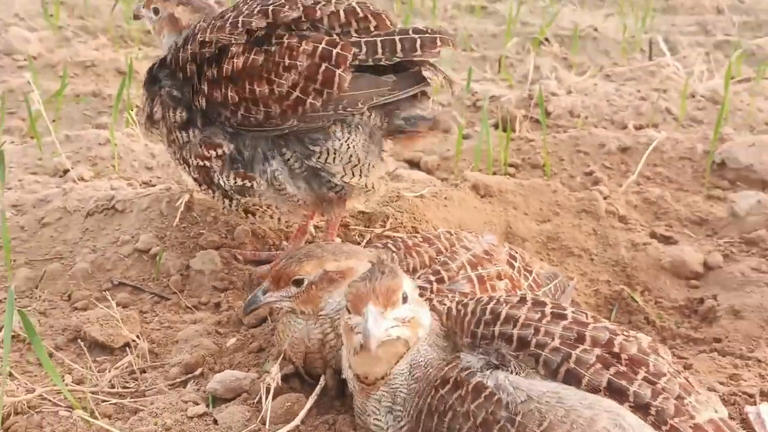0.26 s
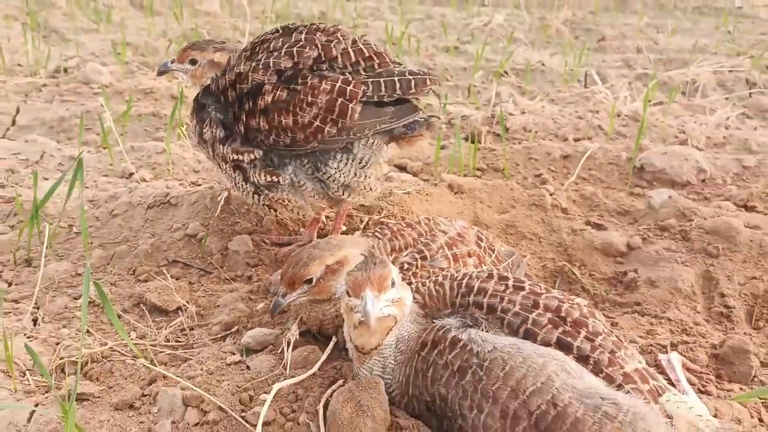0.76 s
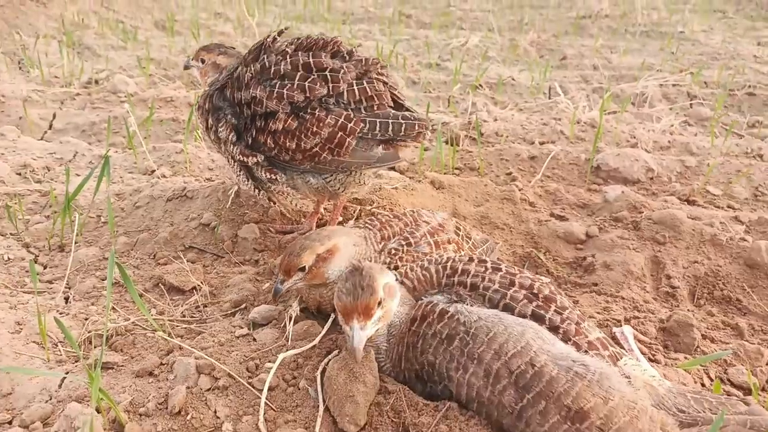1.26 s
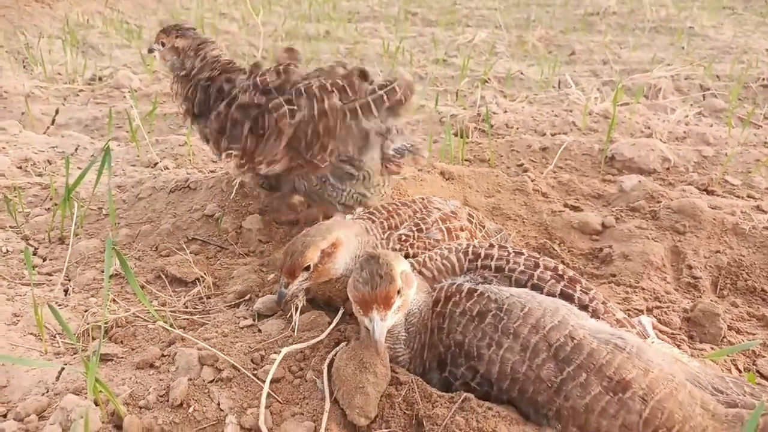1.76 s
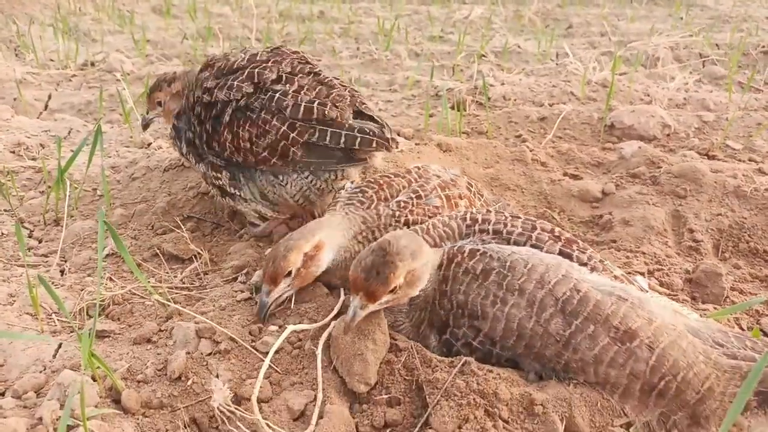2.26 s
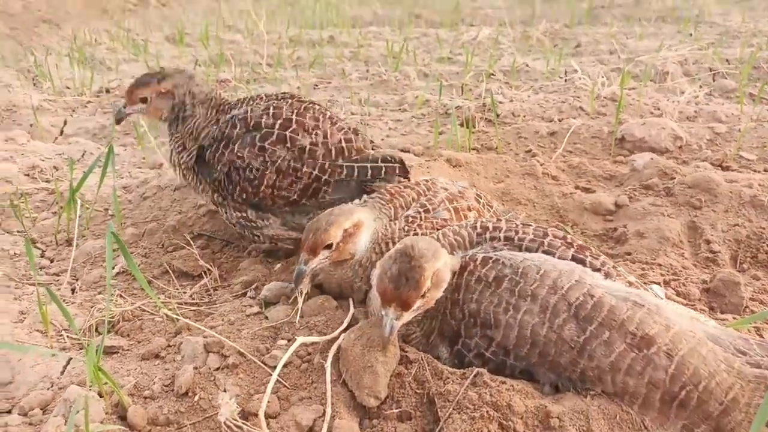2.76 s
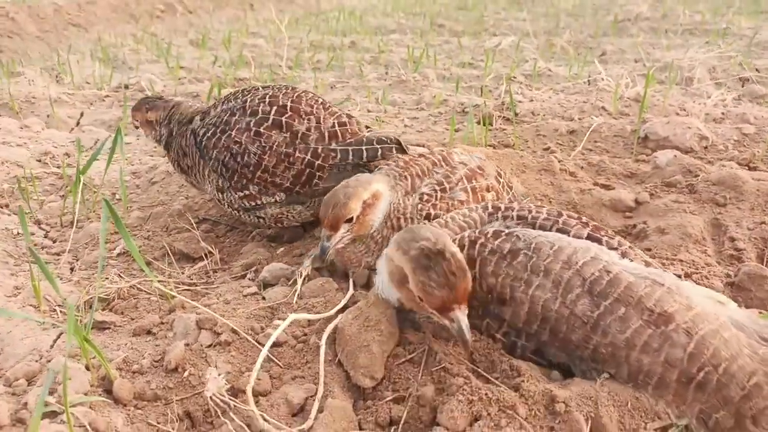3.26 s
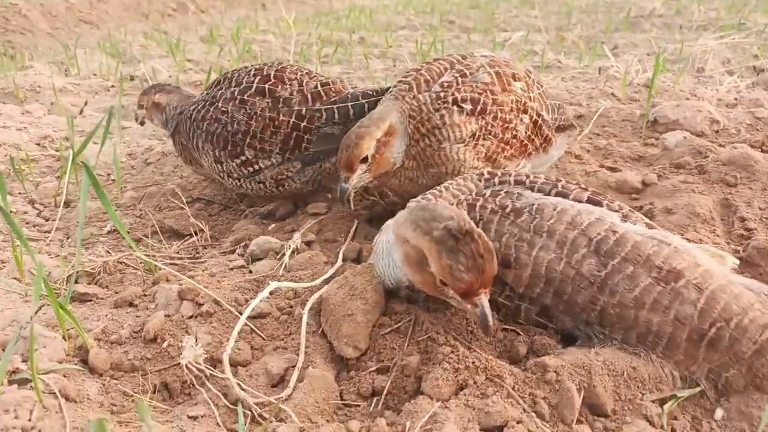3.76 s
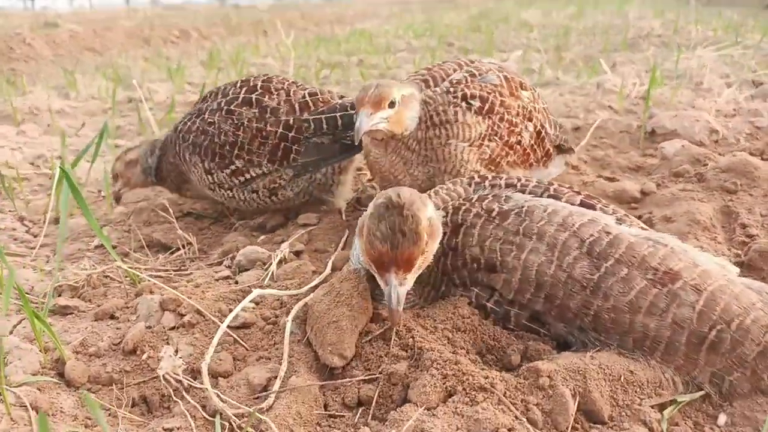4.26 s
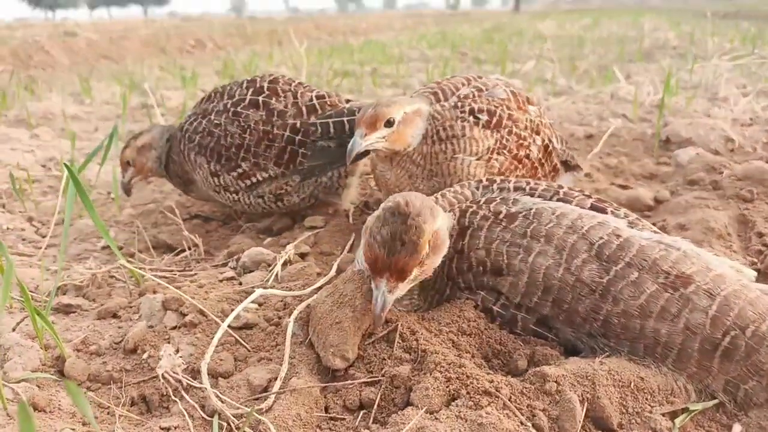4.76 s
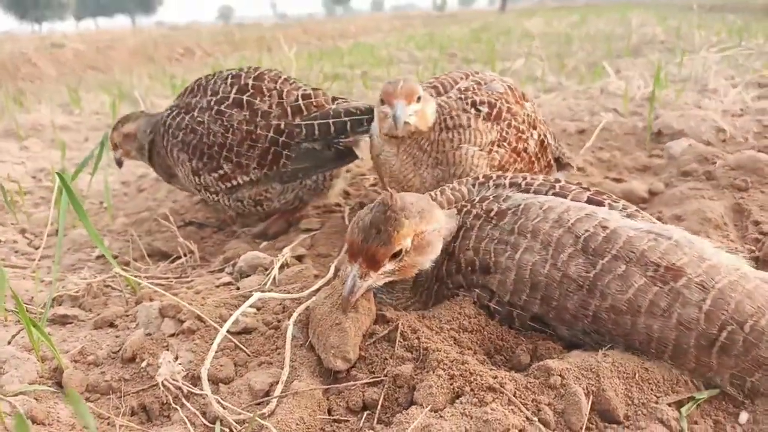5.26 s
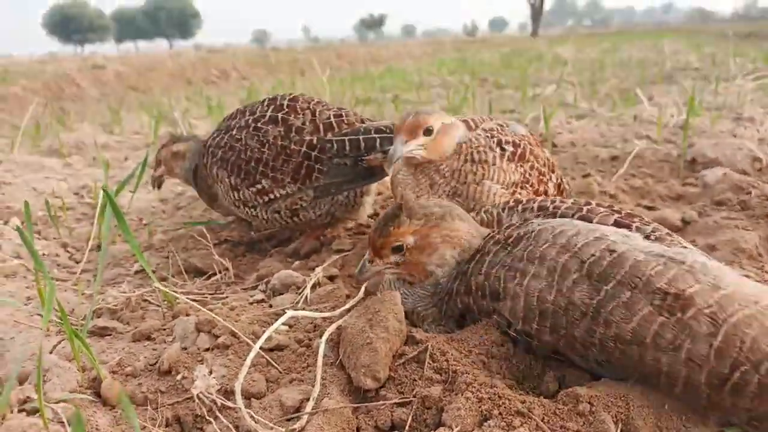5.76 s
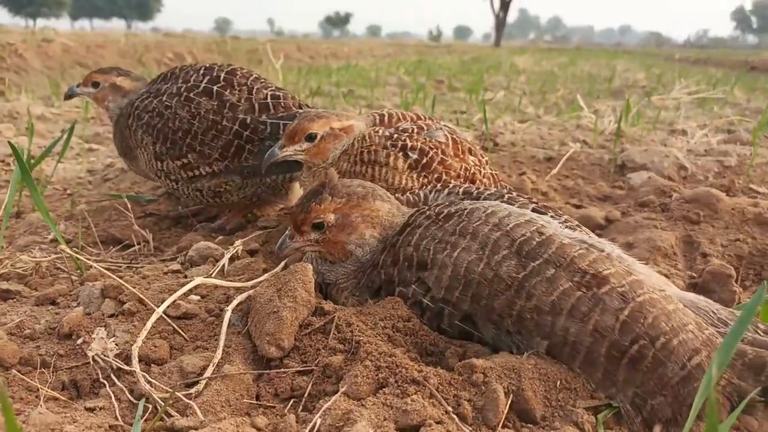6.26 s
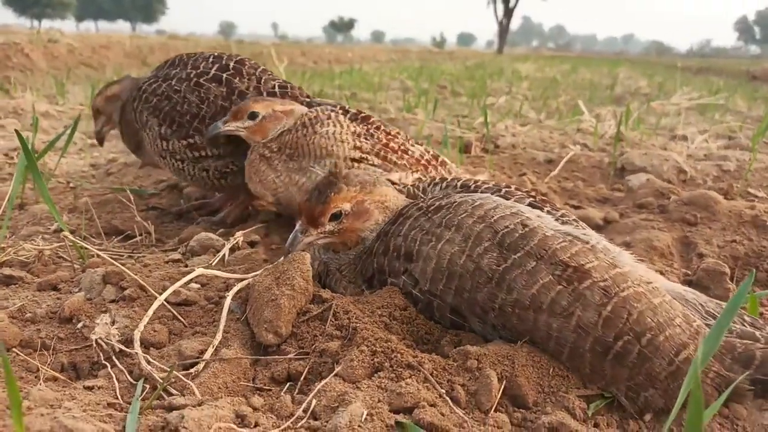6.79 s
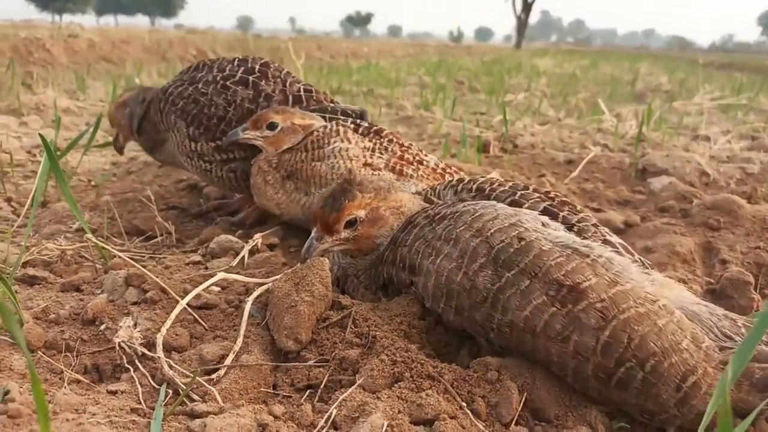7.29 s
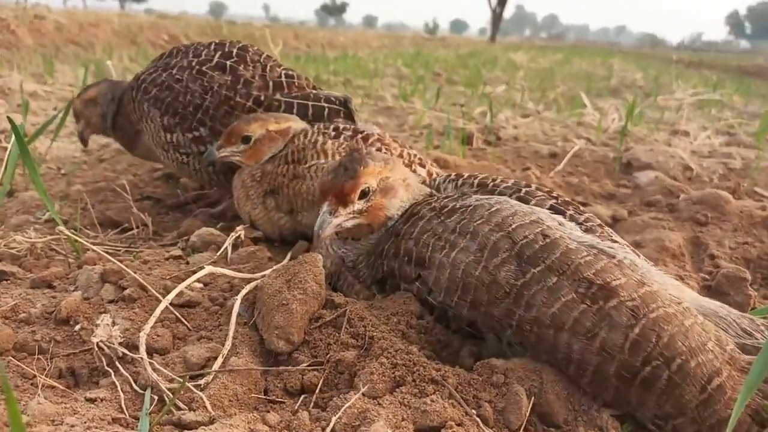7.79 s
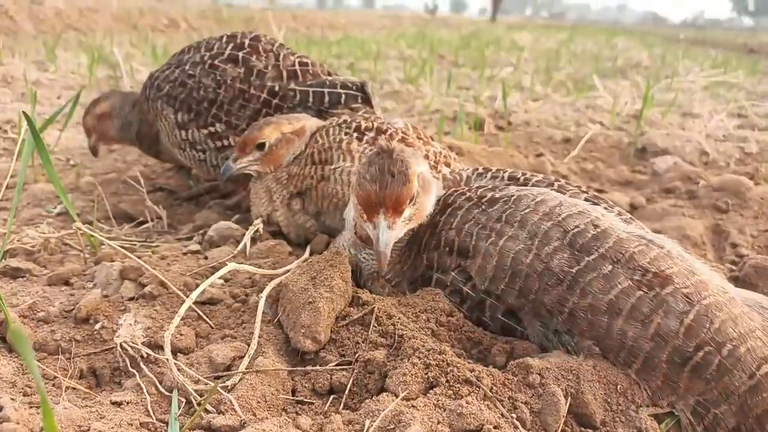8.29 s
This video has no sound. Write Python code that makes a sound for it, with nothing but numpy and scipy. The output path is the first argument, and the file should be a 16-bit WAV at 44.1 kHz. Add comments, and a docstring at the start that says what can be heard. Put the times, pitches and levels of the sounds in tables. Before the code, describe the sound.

Three young partridges peck, shake their feathers and kick up loose dry soil in a quiet open field, with tiny soft peeps.

```python
"""Three young partridges dust-bathe in loose dry soil, close to a microphone in an open field with a light breeze.
Beaks peck and click first; then one bird shakes its plumage, steps down on clods and kicks the ground in a run.
The thrown soil rains down, sand slides off the birds' backs, and stiff feathers sweep and scrape in the hollow.
Pecks and bill snaps return near the end. Soft peeps come between, and far birds call now and then.
Blows are damped modes of the ground, clicks are short rings, and soil is many tiny grains of coloured noise."""
import sys
import numpy as np
from scipy import signal
from scipy.fft import rfft, irfft, next_fast_len
from scipy.io import wavfile

SR = 44100
rng = np.random.default_rng(int(sys.argv[2]) if len(sys.argv) > 2 else 0)


def put_to_file(sound):
    """Save the sound as 16-bit audio at rate SR, in the file named by the first command-line argument."""
    columns = np.atleast_2d(sound).T  # one column per channel
    safe = np.clip(columns, -1, 1)
    whole_steps = np.round(safe * 32767)
    wavfile.write(sys.argv[1], SR, whole_steps.astype(np.int16))


N = 376173
TIME = np.arange(N) / SR

# a run of kicks into the ground: start_s, force_db, contact_hardness_hz, crumb_crack_db
KICK_ROWS = [(2.458, -19.5, 840, -27), (2.4785, -16.5, 845, -37), (2.517, -12.5, 730, -33),
             (2.5656, -11.5, 1070, -17), (2.5929, -12, 2088, -21), (2.6147, -11, 2223, -8),
             (2.644, -9.5, 2042, -9.5), (2.6894, -9.5, 950, -2), (2.724, -10, 565, -5.5),
             (2.7549, -11.5, 4130, -2.5)]
# pecks at the ground: start_s, force_db, ground_pitch_hz, crumb_crack_db
PECK_ROWS = [(0.3412, -39, 226, -55), (0.4682, -29.5, 302, -40.5), (0.51, -39.5, 269, -40),
             (.58, -26, 294, -24), (.619, -36.5, 328, -39), (.721, -23, 337, -26.5),
             (1.0858, -38.5, 368, -36.5), (1.1997, -27.5, 340, -48), (1.2725, -22.5, 410, -30),
             (1.513, -30.5, 350, -36), (1.542, -22, 346, -28.5), (6.4096, -40, 140, -54),
             (6.44, -30.5, 164, -34.5), (6.5396, -29.5, 185, -27), (6.573, -25.5, 167, -24.5)]
# colour of fine sand: frequency_hz, level_db
SAND_COLOUR = [(300, -11.5), (1500, -8), (3200, -4.5), (5500, -1), (8000, -7), (11000, -7), (15500, -1.5)]
# colour of grit: frequency_hz, level_db
GRIT_COLOUR = [(400, -31.5), (1200, -0.5), (2300, -16), (4000, 4), (6500, 4.5), (8500, -8.5),
               (12000, -29.5)]


def amp(db):
    """Decibels to gain."""
    return 10 ** (np.asarray(db) / 20)


def unit(x):
    """Scales to rms 1."""
    return x / np.sqrt(np.mean(x ** 2) + 1e-20)


def add(mix, s, sound):
    """Mixes a sound in at time s."""
    part = mix[max(round(s * SR), 0):][:len(sound)]
    part += sound[:len(part)]


def level(s, db):
    """Gain along a curve, silent outside it."""
    return amp(np.interp(TIME, s, db, left=-np.inf, right=-np.inf))


def burst(length, rise_s, fall_s):
    """Gain that rises linearly, holds until the given length in seconds, then decays exponentially."""
    t = np.arange(0, length + 10 * fall_s, 1 / SR)
    rise = np.minimum(t / rise_s, 1)
    return rise * np.exp(-np.maximum(t - length, 0) / fall_s)


def swells(rows):
    """Gain of bell-shaped swells (middle_s, half_length_s, level_db), added in power."""
    power = 0
    for middle_s, half_s, db in rows:
        bell = np.exp(-2 * np.minimum(((TIME - middle_s) / half_s) ** 2, 20))
        power = power + amp(db) ** 2 * bell
    return np.sqrt(power)


def colour(x, spectrum, size=2048):
    """Causal minimum-phase filter of unit energy with the given spectrum."""
    hz, db = np.transpose(spectrum)
    bins_hz = abs(np.fft.fftfreq(size, 1 / SR)) + 1
    log_gain = np.log(amp(np.interp(np.log(bins_hz), np.log(hz), db)))
    taps = np.fft.ifft(np.exp(np.conj(signal.hilbert(log_gain)))).real
    return signal.oaconvolve(x, taps / np.linalg.norm(taps))[:len(x)]


def wander(rate_hz):
    """Random drift of rms 1 that holds only frequencies below the rate."""
    size = next_fast_len(N, True)
    spectrum = rfft(rng.standard_normal(size))
    slow = np.fft.rfftfreq(size, 1 / SR) < rate_hz
    return unit(irfft(spectrum * slow, size)[:N])


def grains(spectrum, per_s, spread_db, clump_db, clump_hz):
    """Tiny collisions of uneven size that come in clumps."""
    hits = (rng.random(N) < per_s / SR) * rng.choice([-1, 1], N)
    spread = spread_db * np.minimum(rng.exponential(1, N), 5)
    sizes = amp(spread + clump_db * wander(clump_hz))
    return unit(colour(hits * sizes, spectrum))


def rippled(x, depth_db, width_hz, hold_s):
    """Shifting hollows between feathers and clods favour some pitches and dull others."""
    frames = signal.stft(x, nperseg=512, noverlap=384)[2]
    across = np.fft.fftfreq(frames.shape[0], SR / 512)[:, None]
    along = np.fft.fftfreq(frames.shape[1], 128 / SR)
    smooth = np.exp(-(across * width_hz) ** 2 - (along * hold_s) ** 2)
    noise = rng.standard_normal(frames.shape)
    patches = unit(np.fft.ifft2(np.fft.fft2(noise) * smooth).real)
    return unit(signal.istft(frames * amp(depth_db * patches), nperseg=512, noverlap=384)[1][:N])


def air(breeze_db=-69, field_db=-68.5, lumpy_db=6.0):
    """Lumpy breeze with gusts at the microphone, over the faint, mostly low noise of the field."""
    # puffs of air at the microphone: middle_s, half_length_s, level_db
    gust_rows = [(.26, 0.027, -47), (.6, 0.42, -61.5), (1.01, 0.028, -53), (1.52, .04, -56.5),
                 (1.83, 0.13, -44), (2.24, 0.044, -46), (2.35, 0.034, -52), (2.45, 0.12, -41.5),
                 (2.82, 0.28, -47.5), (3.43, .04, -54), (3.565, .025, -44.5), (4.005, 0.025, -42.5),
                 (4.16, .025, -42), (4.2, 0.11, -48), (4.98, 0.11, -59), (5.4, 0.024, -51.5),
                 (5.75, 0.41, -57.5), (6.01, 0.017, -40), (6.12, 0.089, -55), (6.76, 0.027, -65.5),
                 (7.22, 0.056, -62), (7.55, 0.074, -58.5), (8.2, .06, -63)]
    # colour of the wind rumble: frequency_hz, level_db
    wind_colour = [(20, -24), (45, -17), (80, 2.5), (140, -6), (220, -13.5), (400, -22), (1200, -40),
                   (6000, -70)]
    # colour of the open field: frequency_hz, level_db
    field_colour = [(59, -30.5), (100, 3.5), (150, -0.5), (249, -14.5), (302, -12), (350, -12), (2040, -27),
                    (3940, -27.5), (7770, -36.5), (15000, -38.5), (16000, -37)]
    wind = colour(rng.standard_normal(N), wind_colour)
    wind = unit(wind * amp(lumpy_db * wander(7.5)))
    field = colour(rng.standard_normal(N), field_colour)
    return np.hypot(amp(breeze_db), swells(gust_rows)) * wind + amp(field_db) * field


def far_birds(blur_hz=130, waver=.02):
    """Calls blurred by distance into narrow noise, and one falling whistle with a wavering pitch."""
    # far birds calling: middle_s, half_length_s, pitch_hz, level_db
    call_rows = [(0.854, 0.34, 1900, -80), (2.243, 0.082, 2240, -62.5), (8.141, 0.089, 1810, -79)]
    # the falling whistle as a curve: time_s, pitch_hz, level_db
    whistle_curve = [(8.071, 6700, -103), (8.103, 5930, -75), (8.13, 4800, -73)]
    blur = wander(blur_hz)
    out = np.zeros(N)
    for middle_s, half_s, hz, db in call_rows:
        call = unit(blur * np.sin(2 * np.pi * hz * TIME))
        out += swells([(middle_s, half_s, db)]) * call
    s, hz, db = np.transpose(whistle_curve)
    whistle_hz = np.interp(TIME, s, hz) * (1 + waver * wander(300))
    whistle = unit(np.sin(2 * np.pi * np.cumsum(whistle_hz) / SR))
    return out + level(s, db) * whistle


def peeps(ease=0.77, roundness=0.64):
    """Soft gliding notes with two overtones swell and fade, some paired as the voice breaks upward."""
    # peeps: start_s, length_s, first_pitch_hz, last_pitch_hz, level_db, overtone_step_db
    peep_rows = [(1.944, 0.032, 1590, 1930, -52.5, -8), (1.973, 0.026, 1900, 2640, -54, 1.5),
                 (3.702, 0.11, 1090, 1490, -67, -23), (3.787, 0.015, 1830, 2000, -47, -30),
                 (5.995, 0.033, 594, 1695, -65, -6), (6.015, 0.038, 1620, 1800, -61.5, -10),
                 (6.056, 0.027, 2090, 2570, -54, -21), (6.739, 0.049, 1510, 1796, -48.5, -17.5),
                 (6.79, 0.015, 2030, 1700, -57, -19)]
    out, wobble = np.zeros(N), 1 + .008 * wander(300)
    for s, length, first_hz, last_hz, db, step_db in peep_rows:
        u = np.arange(0, 1, 1 / (length * SR))  # progress through the note
        glide_hz = first_hz + (last_hz - first_hz) * u ** ease
        hz = glide_hz * wobble[round(s * SR):][:len(u)]
        phase, step = 2 * np.pi * np.cumsum(hz) / SR, amp(step_db)
        voice = np.sin(phase) + step * np.sin(2 * phase) + .2 * step ** 2 * np.sin(3 * phase)
        swell = abs(np.sin(np.pi * u)) ** roundness
        add(out, s, amp(db) * swell * np.sqrt(2) * voice)
    return out


def spills():
    """Fine sand slides through feathers in soft swishes."""
    # sand sliding off feathers: middle_s, half_length_s, level_db
    spill_rows = [(.07, 0.024, -58.5), (.125, 0.012, -62.5), (1.07, 0.1, -69), (3.01, 0.041, -50.5),
                  (3.3, 0.37, -59.5), (3.415, 0.03, -51.5), (3.69, 0.031, -51), (4.015, 0.03, -52.5),
                  (4.07, 0.038, -56), (4.165, 0.045, -50.5), (4.35, 0.1, -61.5), (4.48, 0.11, -55.5),
                  (5.8, 0.024, -35), (6.3, 0.022, -53.5), (7.6, 0.14, -83)]
    sand = grains(SAND_COLOUR, per_s=12000, spread_db=-0.5, clump_db=1.45, clump_hz=90)
    return swells(spill_rows) * rippled(sand, depth_db=2, width_hz=1800, hold_s=0.047)


def steps(length=0.0037, rise_s=0.0049, fall_s=0.023, sharpness=4.8, grit_db=-12):
    """Clods knock together hollowly under a foot, as noise through a resonance, with a little grit."""
    # feet shifting on loose clods: start_s, level_db, clod_pitch_hz
    step_rows = [(2.035, -66, 494), (2.172, -48, 617), (2.224, -42, 556), (2.256, -42.5, 463),
                 (2.297, -44.5, 402), (2.344, -40.5, 293), (2.434, -40.5, 400)]
    out, shape = np.zeros(N), burst(length, rise_s, fall_s)
    grit = grains(GRIT_COLOUR, per_s=1200, spread_db=8.5, clump_db=4.5, clump_hz=150)
    for s, db, hz in step_rows:
        resonance = signal.iirpeak(hz, sharpness, fs=SR)
        knock = unit(signal.lfilter(*resonance, rng.standard_normal(SR))[:len(shape)])
        grit_here = grit[round(s * SR):][:len(shape)]
        add(out, s, amp(db) * shape * (knock + amp(grit_db) * grit_here))
    return out


def shower(rise_s=0.01):
    """Soil thrown by the last kick rains back as a dense hiss, the fine part for longest."""
    # coarse soil, then fine: level_db, hold_s, fall_s
    shower_rows = [(-41, 0.12, 0.071), (-56.5, 0.3, 0.13)]
    # colour of the coarse soil: frequency_hz, level_db
    coarse_colour = [(59, -33), (100, 0.5), (333, -2), (487, -0.5), (879, -7), (1180, -10.5), (1370, -6),
                     (1760, -4.5), (3770, -6), (6950, -19), (15500, -21)]
    out, last_kick_s = np.zeros(N), KICK_ROWS[-1][0]
    for spectrum, (db, hold_s, fall_s) in zip((coarse_colour, SAND_COLOUR), shower_rows):
        shape = burst(hold_s, rise_s, fall_s)
        soil = grains(spectrum, per_s=11000, spread_db=4.0, clump_db=1.8, clump_hz=122)
        add(out, last_kick_s, amp(db) * shape * soil[:len(shape)])
    return out


def clicks(rows, fade_s, ring_cycles, snap_db, snap_s=0.0001, swell_s=0.0025, size=4096):
    """A snap with a very short ring, inside a soft noise that swells just before and fades after."""
    out, t = np.zeros(N), (np.arange(size) - size // 4) / SR  # the snap falls at t = 0
    after = np.maximum(t, 0)
    for s, db, hz, noise_db in rows:
        snap, noise = rng.standard_normal((2, size))
        ring = np.sin(2 * np.pi * hz * after) * np.exp(-after * hz / ring_cycles)
        snap = amp(snap_db) * snap * (t >= 0) * np.exp(-after / snap_s)
        noise = noise * np.exp(-abs(t) / np.where(t < 0, swell_s, fade_s))
        add(out, s + t[0], amp(db) * (ring + snap) + amp(noise_db) * noise)
    return out


def crumbs(noise_db=-28, spread_db=4, middle_hz=4500):
    """Straw, crumbs and a dry clod crack and knock, with fainter crumbs ticking at random moments."""
    # cracks of straw and crumbs, and two low knocks of a dry clod;
    # the two strongest near 1.7 kHz ring with the last kicks: start_s, level_db, pitch_hz
    crack_rows = [(.678, -31.5, 3240), (.824, -36.5, 4300), (.969, -26, 3680), (1.1987, -37, 2220),
                  (2.022, -28.5, 4500), (2.177, -38, 676), (2.182, -31.5, 565), (2.2, -32.5, 6500),
                  (2.266, -34, 4500), (2.357, -31.5, 3370), (2.4226, -32, 3800), (2.493, -27.5, 5400),
                  (2.603, -19.5, 7000), (2.6865, -23, 3800), (2.7135, -20, 4300), (2.7245, -14.5, 1850),
                  (2.7551, -10.5, 1660), (2.924, -28.5, 4570), (3.822, -46, 3210), (8.376, -45, 4350),
                  (2.978, -27.5, 4530), (4.26, -33, 6500), (4.784, -29, 2820), (4.999, -14.5, 4300),
                  (5.532, -30, 3060)]
    # small crumbs ticking at random: from_s, to_s, count, middle_level_db
    crumb_rows = [(2.18, 2.7, 10, -47), (0, 1.6, 12, -62), (6.8, 8.5, 8, -66)]
    cracks = list(crack_rows)
    for start_s, end_s, count, db in crumb_rows:
        for _ in range(round(count)):
            s = rng.uniform(start_s, end_s)
            crumb_db = db + spread_db * rng.uniform(-1, 1)
            cracks.append((s, crumb_db, middle_hz * 2 ** rng.uniform(-1, 1)))
    # the soft noise is set relative to each crack
    softened = [(s, db, hz, db + noise_db) for s, db, hz in cracks]
    return clicks(softened, fade_s=0.0098, ring_cycles=0.95, snap_db=-12)


def bills(lower_hz=4540, lower_db=-15, lower_noise_db=-30):
    """Each snap of a bill on a crumb rings high, with a weaker ring below."""
    # the bill snapping on a crumb: start_s, level_db, pitch_hz, soft_noise_db
    snap_rows = [(0.964, -19.5, 7360, -50), (.986, -26.5, 8500, -48), (1.069, -38.5, 8500, -68),
                 (4.596, -39.5, 12200, -74), (6.058, -29, 13000, -51), (6.2868, -15.5, 10060, -45),
                 (6.3418, -22, 9700, -49.5), (6.442, -32, 10000, -59), (6.675, -36.5, 9600, -63.5),
                 (7.008, -55, 8970, -69.5), (7.166, -34.5, 12820, -60.5), (7.612, -39, 12500, -66),
                 (8.037, -41, 13000, -67), (8.373, -37, 8000, -64)]
    # the lower ring's levels are relative to the snap's own
    lower = [(s, db + lower_db, lower_hz, noise_db + lower_noise_db) for s, db, hz, noise_db in snap_rows]
    return clicks(list(snap_rows) + lower, fade_s=0.013, ring_cycles=1.56, snap_db=-15)


def strokes():
    """Stiff feathers rasp over grit; the freer strokes fling a broad spray of dust."""
    # sweeps of wings and bodies over the soil: start_s, length_s, level_db, thrown_dust_share (0-1)
    sweep_rows = [(0.189, 0.079, -61, 0.76), (0.332, 0.02, -60, 0.8), (0.447, 0.031, -60.5, 0.8),
                  (0.954, 0.028, -47, 0), (1.763, 0.016, -48, 0.8), (1.875, 0.013, -39.5, 0.9),
                  (4.37, 0.047, -35, 0.86), (4.657, 0.016, -51.5, 0.5), (4.685, 0.05, -51, 0.71),
                  (4.761, 0.0075, -37.5, 0.4), (4.913, 0.041, -36.5, 0.3), (4.961, 0.037, -25, .14),
                  (5.753, 0.035, -34, 0.61), (6.289, 0.012, -49.5, 0.87), (6.323, 0.03, -57, 0.96)]
    # stiff feathers scraping along the hollow: start_s, length_s, level_db
    scrape_rows = [(4.93, 0.013, -25.5), (5.284, 0.015, -45), (5.335, 0.027, -27.5), (5.384, 0.012, -24.5),
                   (5.442, 0.034, -41), (5.491, 0.016, -22.5), (5.526, 0.017, -37.5), (5.587, 0.017, -49)]
    # the body dragging slowly around the scrapes: middle_s, half_length_s, level_db
    drag_rows = [(5.26, 0.023, -58), (5.36, .05, -50.5), (5.53, .09, -52), (5.72, 0.066, -51)]
    # colour of the rasp: frequency_hz, level_db
    rasp_colour = [(80, -32), (180, -30.5), (240, -18.5), (330, -3), (600, 0), (1000, 1), (1600, 2.5),
                   (2300, -0.5), (2900, -3.5), (4200, 0.5), (5500, -1.5), (6400, -6), (7600, -24.5),
                   (10000, -33), (15000, -23)]
    # colour of the thrown spray: frequency_hz, level_db
    spray_colour = [(47, -36.5), (80, -9), (156, -5.5), (310, 5), (520, 1.5), (850, -4.5), (1630, -20.5),
                    (3000, -20.5), (5000, -18.5), (7400, -10.5), (10000, -26), (13000, -17), (16000, -24.5)]
    rasp_power, spray_power = swells(drag_rows) ** 2, np.zeros(N)
    for s, length, db in scrape_rows:
        add(rasp_power, s, (amp(db) * burst(length, rise_s=0.02, fall_s=0.008)) ** 2)
    # neck feathers swish just ahead of each peck
    lunge_lead_s, lunge_s, lunge_db, lunge_dust = 0.013, .022, -61.5, 0.63
    lunges = [(s - lunge_lead_s, lunge_s, lunge_db, lunge_dust) for s, *_ in PECK_ROWS]
    for s, length, db, dust in list(sweep_rows) + lunges:
        power = (amp(db) * burst(length, rise_s=.006, fall_s=.013)) ** 2
        add(rasp_power, s, (1 - dust) * power)
        add(spray_power, s, dust * power)
    rasp = grains(rasp_colour, per_s=14000, spread_db=2.5, clump_db=3.0, clump_hz=243)
    rasp = rippled(rasp, depth_db=2, width_hz=730, hold_s=0.07)
    spray = grains(spray_colour, per_s=20000, spread_db=2.6, clump_db=1.2, clump_hz=200)
    spray = rippled(spray, depth_db=2.5, width_hz=400, hold_s=0.03)
    return np.sqrt(rasp_power) * rasp + np.sqrt(spray_power) * spray


def shake(flutter_db=2, flutter_hz=80):
    """Clods patter, grit crackles and dust hisses, all jostled by the same feathers."""
    # the plumage shake as a curve: time_s, vigour_db
    shake_curve = [(1.6, -89), (1.614, -66), (1.78, -38.5), (1.81, -47), (1.89, -46), (1.926, -54.5),
                   (1.95, -43.5), (2.002, -52), (2.042, -49.5), (2.05, -53), (2.16, -72.5)]
    # clods, grit and dust against the vigour: level_db
    size_levels = (-1, -6, -12)
    # colour of the clods: frequency_hz, level_db
    clod_colour = [(50, -20), (130, -14.5), (300, -4.5), (600, -6.5), (1100, -18.5), (2200, -18),
                   (5000, -56.5)]
    # colour of the dust: frequency_hz, level_db
    dust_colour = [(5000, -32), (8500, 0), (11000, -4), (15500, 5)]
    sizes = [grains(clod_colour, per_s=1800, spread_db=3.5, clump_db=2.0, clump_hz=67.5),
             grains(GRIT_COLOUR, per_s=8600, spread_db=3.0, clump_db=-2.6, clump_hz=147),
             grains(dust_colour, per_s=9000, spread_db=2.8, clump_db=1.4, clump_hz=150)]
    soil = sum(amp(db) * size for db, size in zip(size_levels, sizes))
    soil = np.std(soil) * rippled(soil, depth_db=2.0, width_hz=280, hold_s=.04)
    flutter = unit(amp(flutter_db * wander(flutter_hz)))
    return level(*np.transpose(shake_curve)) * soil * flutter


def blows(rows, radiate_hz, crumble_db, crumble_s, scuff_s=0.00062, size=4096):
    """A short push makes the ground thud in two damped modes while crumbs crack under it."""
    # colour of cracking crumbs: frequency_hz, level_db
    crunch_colour = [(300, -30.5), (1500, 2), (2800, 13.5), (4500, 7.5), (7500, -7.5), (11000, -12),
                     (16000, -14)]
    damping, upper_ratio, upper_share = .56, 2.4, .4
    thuds, crunch = np.zeros(N), np.zeros(N)
    t, jf = (np.arange(size) - size // 4) / SR, 1j * np.fft.rfftfreq(size, 1 / SR)
    # a scuff leads in, then crumbs settle
    crumbling = np.exp(-abs(t) / np.where(t < 0, scuff_s, crumble_s))
    # a small patch of soil radiates little deep bass
    radiation = jf ** 2 / (jf ** 2 + jf * radiate_hz + radiate_hz ** 2)
    for s, db, ground_hz, contact_hz, crack_db in rows:
        low, high = jf / ground_hz, jf / (ground_hz * upper_ratio)
        lower_mode = low / (1 + damping * low + low ** 2)
        upper_mode = upper_share * high / (1 + damping * high + high ** 2)
        ground = (lower_mode + upper_mode) * radiation
        push = 1 / (1 + jf / contact_hz) ** 2  # a harder contact is shorter and brighter
        add(thuds, s, -amp(db) * irfft(ground * push) * SR / (2 * np.pi * ground_hz))
        add(crunch, s, -amp([crack_db]))  # one sharp crack
        add(crunch, s + t[0], amp(db + crumble_db) * crumbling * rng.standard_normal(size))
    return thuds + colour(crunch, crunch_colour)


def knocks(peck_contact_hz=1120, hardening=0.3, thump_crack_db=-32):
    """Pecks, harder in contact the more they crack, and the drop of a body or a lump of earth."""
    # bodies and lumps of earth dropping on the soil: start_s, force_db, ground_pitch_hz, contact_hardness_hz
    thump_rows = [(1.773, -27.5, 400, 1500), (1.823, -27.5, 300, 1000), (1.862, -25.5, 446, 885),
                  (2.226, -34, 131, 2500), (2.299, -33, 166, 1100), (2.438, -33, 150, 820),
                  (2.8547, -11.5, 1220, 2500), (3.992, -38.5, 94, 1174), (4.3774, -14.5, 286, 710),
                  (4.784, -26, 327, 2000), (5.7568, -21.5, 259, 3000)]
    rows = []
    for s, db, ground_hz, crack_db in PECK_ROWS:
        contact_hz = peck_contact_hz * amp(hardening * (crack_db - db))
        rows.append((s, db, ground_hz, contact_hz, crack_db))
    rows += [(*row, thump_crack_db) for row in thump_rows]
    return blows(rows, radiate_hz=74.4, crumble_db=-57, crumble_s=0.018)


def kicks(ground_hz=183):
    """The feet strike one spot, so the ground keeps its pitch, with more force as they dig in."""
    rows = [(s, db, ground_hz, contact_hz, crack_db) for s, db, contact_hz, crack_db in KICK_ROWS]
    return blows(rows, radiate_hz=72.6, crumble_db=-33, crumble_s=0.0061)


def scene():
    """All sources summed to one channel; open ground gives no echo."""
    background = air() + far_birds()
    birds = peeps() + bills() + knocks()
    loose_soil = spills() + steps() + shower() + crumbs()
    bathing = strokes() + shake() + kicks()
    return (background + birds + loose_soil + bathing)[None]


def record(dry):
    """The recorder's band limit, a steep low-pass at 16 kHz."""
    taps = signal.firwin(255, 16000, window=("kaiser", 8), fs=SR)
    return signal.oaconvolve(dry, taps[None], "same")


dry = scene()
out = record(dry)
put_to_file(out)
```